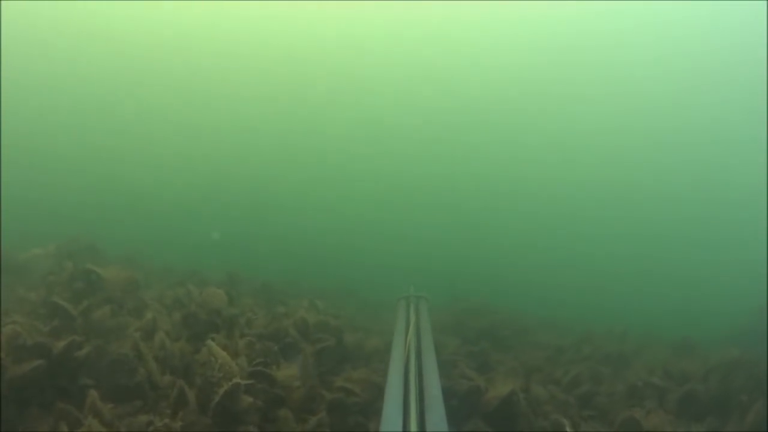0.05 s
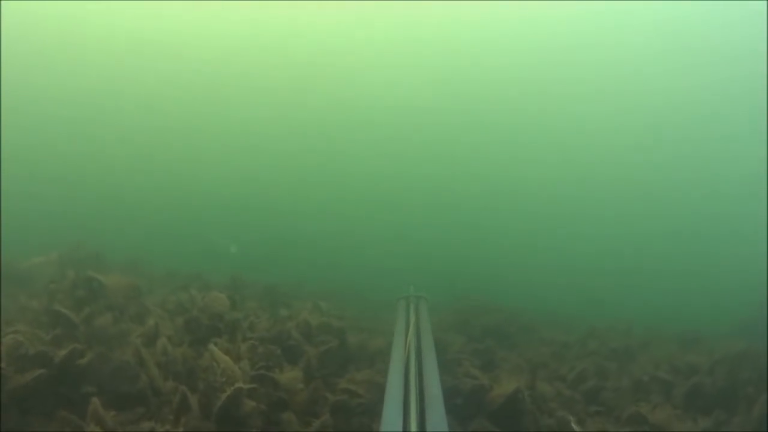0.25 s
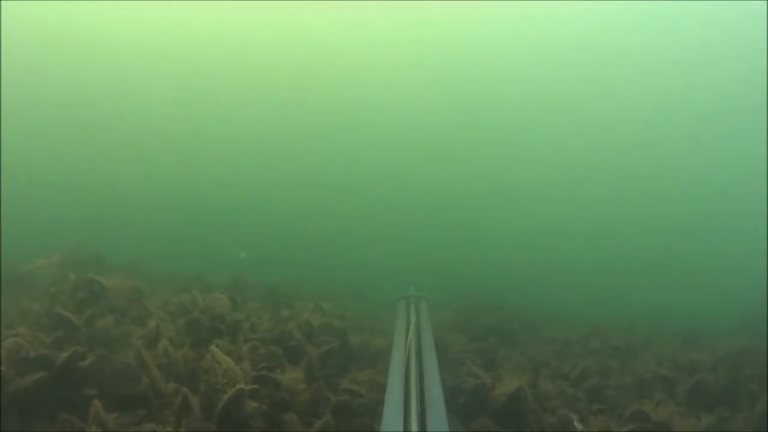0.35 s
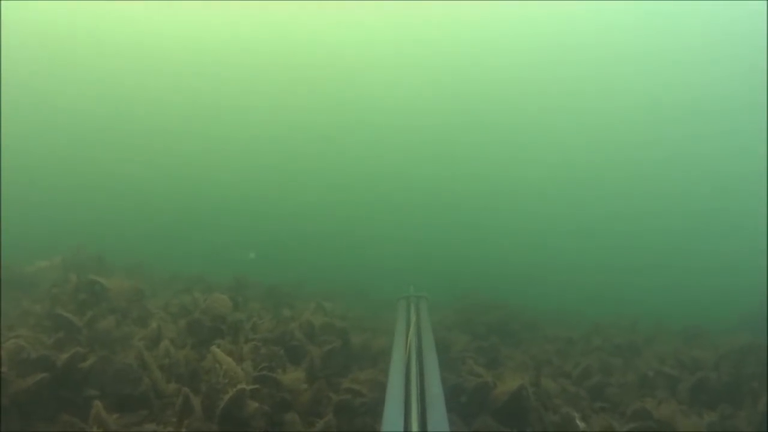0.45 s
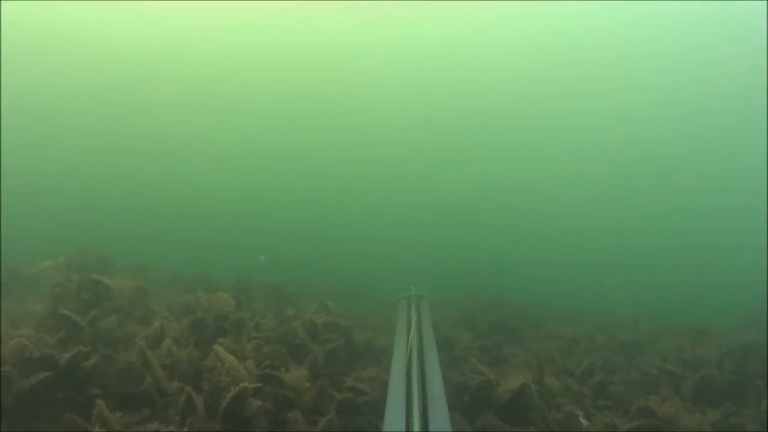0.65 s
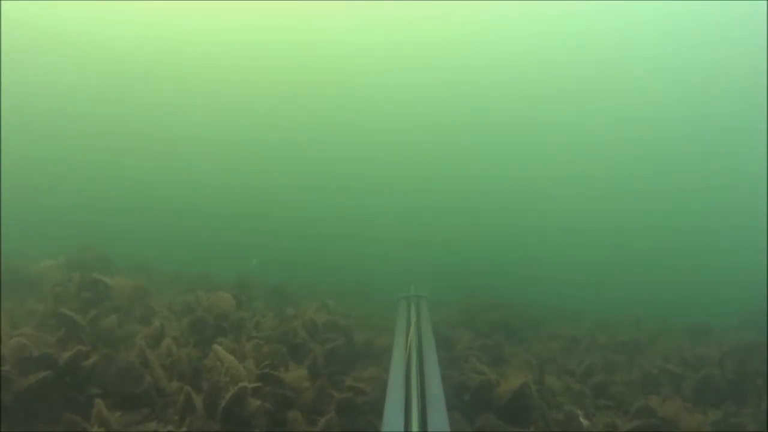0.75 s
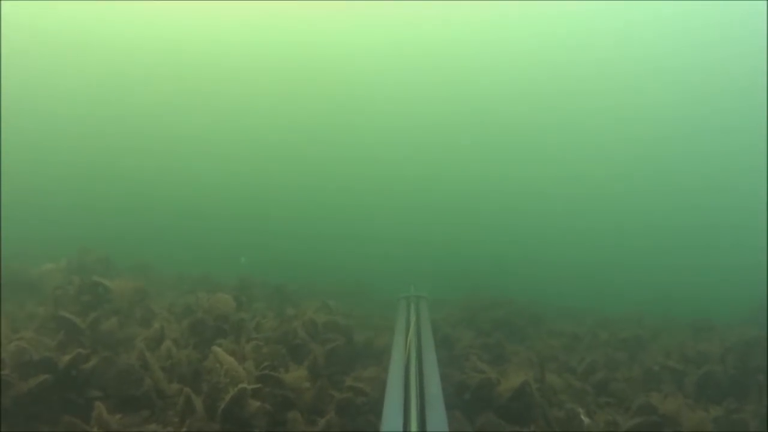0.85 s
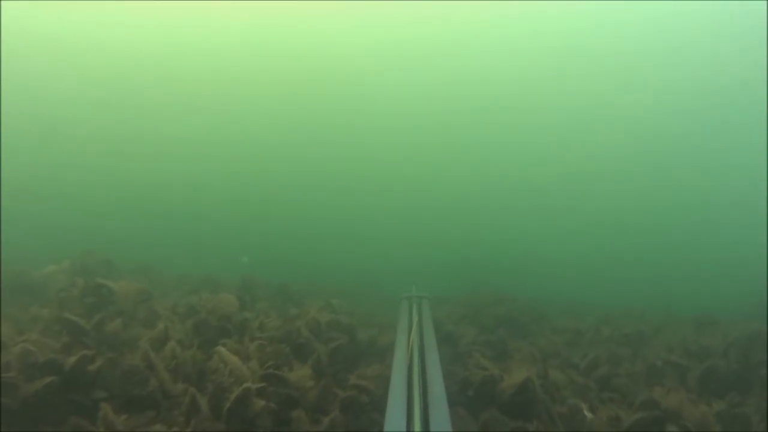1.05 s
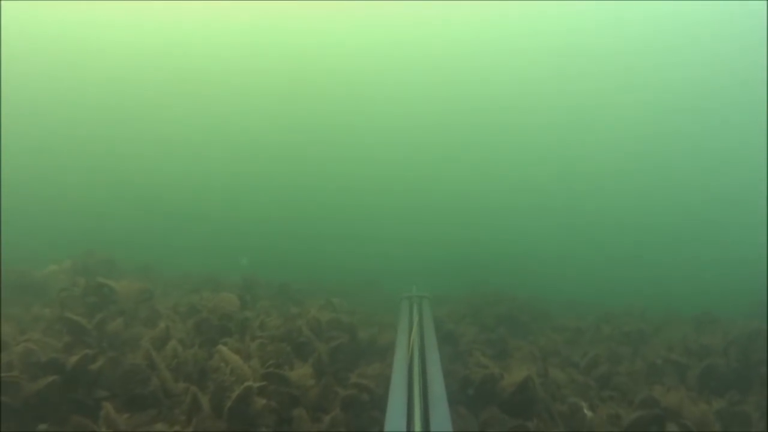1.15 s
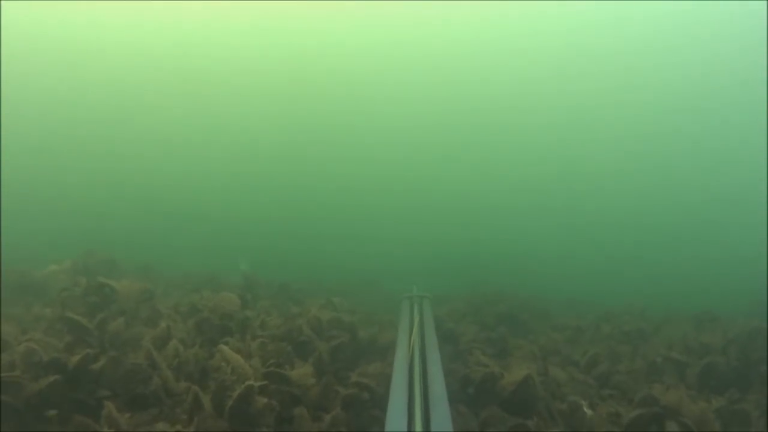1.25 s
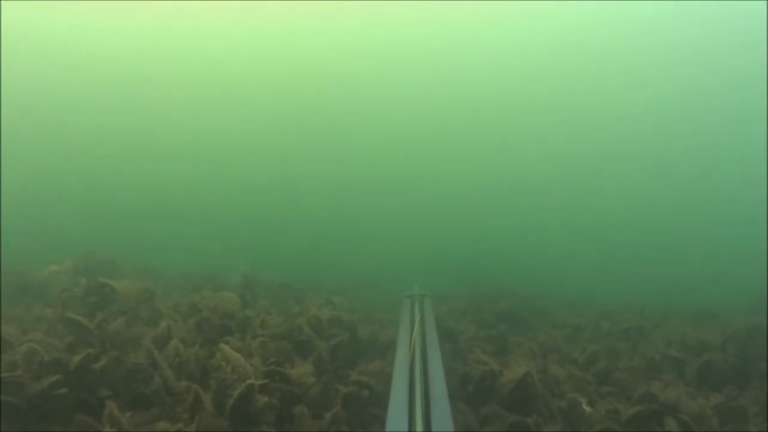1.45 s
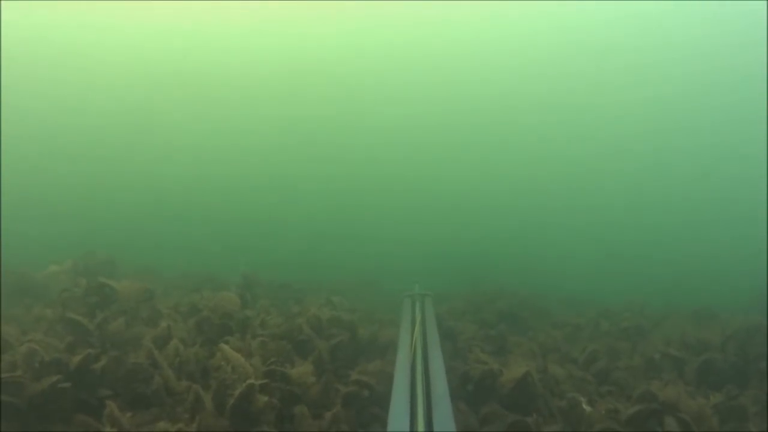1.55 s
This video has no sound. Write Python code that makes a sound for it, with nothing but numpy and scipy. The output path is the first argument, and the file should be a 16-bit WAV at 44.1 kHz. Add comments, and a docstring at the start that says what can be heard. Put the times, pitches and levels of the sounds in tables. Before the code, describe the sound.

A fish probably drums underwater: two low thumps falling in pitch, with faint ticks around.

```python
"""Underwater, over a shell bed, heard from a camera in its housing: two short booming thumps, probably
a fish drumming on its swim bladder, after the tail of an earlier one. Each is a nearly pure tone that
swells while its pitch falls by more than an octave, then stops and leaves a faint low ring.
Tiny snaps near and far, soft knocks close by and one dull crack dot a quiet wash and rumble.
The housing colours the fish, the knocks and the crack differently in the two channels."""
import sys
import numpy as np
from scipy.fft import rfft, irfft, next_fast_len
from scipy.io import wavfile
from scipy.ndimage import map_coordinates

SR = 44100
rng = np.random.default_rng(int(sys.argv[2]) if len(sys.argv) > 2 else 0)


def wrap_up_sound(samples):
    """Save the sound to the file named by the first command line argument, as 16-bit audio."""
    columns = np.atleast_2d(samples).T
    # keep every value between -1 and 1, then stretch to whole-number steps
    tamed = np.clip(columns, -1, 1)
    steps = np.round(tamed * 32767).astype(np.int16)
    wavfile.write(sys.argv[1], SR, steps)


N = 70560
T = np.arange(N) / SR

# wash common to both channels (frequency [Hz], relative density [dB])
WASH_MID_SPECTRUM = [(15, -36.5), (25, -6.5), (118, -3.5), (241, -14.5), (362, -13), (401, -20), (433, -14),
                     (862, -13.5), (1110, -21), (1330, -19.5), (4870, -27.5), (6120, -27), (11000, -30.5),
                     (14300, -62), (22000, -120)]
# wash opposed in the two channels (frequency [Hz], relative density [dB])
WASH_SIDE_SPECTRUM = [(15, -51), (25, -18.5), (69, -6), (156, -2.5), (192, -5), (218, -3), (336, -7.5),
                      (362, -0.5), (391, -4.5), (840, -6), (954, -6.5), (1510, -12.5), (3240, -22),
                      (5390, -27), (11000, -35.5), (14300, -65.5), (22000, -120)]
# low rumble of the water (frequency [Hz], relative density [dB])
RUMBLE_SPECTRUM = [(25, -12), (60, -6), (110, -0.5), (175, -4), (240, -8), (500, -15.5), (1200, -46)]
# trend of the rumble as it settles (time [s], level [dB])
RUMBLE_TREND = [(0, -59), (.45, -66), (1, -69), (1.4, -83.5)]
# end of an earlier thump (time [s], pitch [Hz], level [dB], t60 [s])
EARLIER_TAIL = (0, 134, -15, 0.0775)
# low ring after each thump (time [s], pitch [Hz], level [dB], t60 [s])
AFTER_RINGS = [(0, 169.4, -44, 0.41), (.33, 160.7, -39.5, 0.23), (0.825, 156.8, -40.5, .22)]
# soft knocks close by (time [s], pitch [Hz], level [dB], t60 [s])
SOFT_KNOCKS = [(0.109, 105, -48, .09), (.125, 240, -54.5, .06), (0.511, 110, -52.5, .07),
               (0.584, 185, -58.5, .1), (.982, 186.4, -50, 0.146), (1.075, 80.4, -54.5, .09),
               (1.096, 730, -59, 0.049), (1.256, 166.5, -53.5, 0.066), (1.263, 700, -52.5, 0.068),
               (1.337, 834, -52, 0.063), (1.372, 869, -55.5, 0.074)]
# grit in a knock (frequency [Hz], relative density [dB])
GRIT_SPECTRUM = [(60, -7), (200, -1), (350, -2.5), (800, -5.5), (1200, -22), (3000, -36.5)]
# near snaps (time [s], unused peak [dB], middle before boost [dB], treble before boost [dB])
NEAR_SNAPS = [(0.1091, -55, -63.5, -75.5), (0.1835, -47, -62.5, -59.5), (0.4219, -47.5, -74, -69),
              (0.5366, -59, -80, -69), (0.615, -46.5, -63.5, -63), (0.7257, -55, -65, -68.5),
              (0.751, -46.5, -59.5, -68.5), (1.076, -51.5, -61.5, -64), (1.1221, -48, -60, -56.5),
              (1.206, -51.5, -57.5, -65), (1.3109, -53, -81, -65.5), (1.3283, -59.5, -65, -69),
              (1.3641, -45.5, -53, -63.5)]
# middle band of a snap (frequency [Hz], relative density [dB])
MIDDLE_SPECTRUM = [(500, -17), (1200, -6.5), (2000, 0.5), (3000, -5.5), (4500, -14), (9000, -29)]
# treble band of a snap (frequency [Hz], relative density [dB])
TREBLE_SPECTRUM = [(2000, -18), (4000, -5.5), (5200, 0), (6400, 4), (7500, -8), (11000, -10.5)]
# likeness of the snaps in left and right (frequency [Hz], correlation [-1 to 1])
SNAP_LIKENESS = [(1500, 0.9), (6000, .5)]
# course of the tone, one table per thump (time [s], pitch [Hz], level [dB], octave level [dB])
THUMP_COURSES = [
    [(0.206, 259.7, -24.5, -37), (0.217, 245.1, -15, -24), (0.236, 208, -8.5, -23.5),
     (0.25, 189.6, -6, -41.5), (0.259, 143.8, -5, -32), (0.275, 119.4, -5.5, -32),
     (0.291, 108.5, -6.5, -30.5), (0.299, 112.6, -11.5, -27.5), (0.306, 52.13, -31, -30),
     (0.314, 69.43, -33, -42), (0.326, 140.8, -28.5, -51), (0.338, 115.2, -53.5, -67.5)],
    [(0.692, 288.7, -27, -40.5), (0.704, 283.2, -15.5, -25), (0.716, 249.8, -12.5, -29.5),
     (0.73, 195.6, -6, -17.5), (0.74, 186.3, -4, -34.5), (0.751, 133.4, -6.5, -31), (0.776, 116, -4.5, -33),
     (0.788, 104.7, -8, -29.5), (0.797, 97.2, -14, -31), (0.804, 58.2, -25, -44), (0.816, 107, -25, -56),
     (0.83, 96.26, -46, -54.5)],
]
# higher overtones before the housing colours them (multiple of the pitch, level re the tone [dB])
THUMP_OVERTONES = [(3, -22.5), (4, -37), (5, -33), (6, -42), (7, -38)]
# housing colour on those overtones (frequency [Hz], gain [dB])
HOUSING_COLOUR = [(310, -7.5), (370, 0), (440, -1), (520, -10.5), (620, -9), (720, -23.5), (950, -20.5),
                  (1500, -30)]
# rasp in a thump (frequency [Hz], relative density [dB])
RASP_SPECTRUM = [(30, 2), (80, 5), (300, -10), (600, -14.5), (900, -18), (1500, -28.5), (2500, -33.5),
                 (4500, -49.5)]
# dull crack (frequency [Hz], relative density [dB])
CRACK_SPECTRUM = [(350, -12.5), (700, 3.5), (1400, -1.5), (2500, -15), (5000, -28)]
# level of the right channel against the left (frequency [Hz], gain [dB])
RIGHT_GAIN = [(70, 9), (105, -2.5), (135, -3.5), (170, -8), (200, -9.5), (238, -12), (280, -11),
              (420, -3.5), (580, 0.5)]
# phase of the right channel against the left (frequency [Hz], lead [rad])
RIGHT_PHASE = [(70, .2), (120, 1.2), (175, .12), (205, .33), (240, 1.1), (300, 2.4), (420, 2.24),
               (580, 2.84), (850, 1.56), (1300, .7)]


def amp(db):
    """Decibels to gain."""
    return 10 ** (np.asarray(db) / 20)


def along(points, hz):
    """A table's value at hz, interpolated on a log frequency axis."""
    frequencies, values = np.transpose(points)
    return np.interp(np.log(hz + 1), np.log(frequencies + 1), values)


def curves(rows):
    """One value per sample for each column after the time."""
    times, *columns = np.transpose(rows)
    return [np.interp(T, times, column) for column in columns]


def wobble(knots_per_s):
    """A smooth random curve."""
    return map_coordinates(rng.standard_normal(int(N * knots_per_s / SR) + 4), [T * knots_per_s])


def filtered(x, response):
    """x through a complex frequency response."""
    size = next_fast_len(N + SR // 2)
    return irfft(rfft(x, size) * response(np.fft.rfftfreq(size, 1 / SR)), size)[..., :N]


def noise(spectrum):
    """Coloured noise of rms 1."""
    x = filtered(rng.standard_normal(N), lambda hz: amp(along(spectrum, hz)))
    return x / np.sqrt(np.mean(x ** 2) + 1e-20)


def noise_pair(spectrum, likeness):
    """Stereo coloured noise with a given correlation between the channels."""
    angle = lambda hz: np.arccos(np.clip(along(likeness, hz), -1, 1)) / 2
    mid = filtered(noise(spectrum), lambda hz: np.cos(angle(hz)))
    side = filtered(noise(spectrum), lambda hz: np.sin(angle(hz)))
    return np.array([mid + side, mid - side])


def burst(start, rise_s, t60_s):
    """An envelope that rises at start and dies away."""
    age = np.maximum(T - start, 0)
    return (1 - np.exp(-age / rise_s)) * np.exp(-np.log(1000) * age / t60_s)


def ping(start, hz, db, t60_s, rise_s):
    """One damped vibration."""
    return amp(db) * burst(start, rise_s, t60_s) * np.sin(2 * np.pi * hz * (T - start))


def water(mid_db=-65.5, side_db=-61, flutter_db=1.5):
    """All around the microphone: a steady quiet wash and a low rumble that settles unevenly."""
    mid = amp(mid_db) * noise(WASH_MID_SPECTRUM)
    side = amp(side_db) * noise(WASH_SIDE_SPECTRUM)
    rumble_db = curves(RUMBLE_TREND)[0] + flutter_db * wobble(knots_per_s=42)
    rumble = amp(rumble_db) * noise_pair(RUMBLE_SPECTRUM, likeness=[(100, .4)])
    return np.array([mid + side, mid - side]) + rumble


def fish():
    """Probably a swim bladder being drummed: an earlier tail, two thumps and the faint ring of each."""
    tail = ping(*EARLIER_TAIL, rise_s=.0006)
    rings = sum(ping(*row, rise_s=.023) for row in AFTER_RINGS)
    return tail + rings + sum(thump(course) for course in THUMP_COURSES)


def knocks(rise_s=.003, grit_gain_db=-4.5):
    """Faint dull bumps near the camera, each a short ring with some grit."""
    rings = sum(ping(*row, rise_s) for row in SOFT_KNOCKS)
    envelope = sum(amp(db) * burst(start, rise_s, t60_s) for start, _, db, t60_s in SOFT_KNOCKS)
    return rings + amp(grit_gain_db) * envelope * noise(GRIT_SPECTRUM)


def snaps(middle_boost_db=5, treble_boost_db=7.5, far_per_s=31, far_floor_db=-76.5, far_spread_db=3):
    """Tiny cracks from the sea bed, perhaps shrimp: a few near ones and a scatter of far ones."""
    near = [(start, middle_db + middle_boost_db, treble_db + treble_boost_db)
            for start, _, middle_db, treble_db in NEAR_SNAPS]
    far = [(when * N / SR, *(far_floor_db - far_spread_db * np.log(band_draws)))
           for when, *band_draws in rng.random((int(far_per_s * N / SR), 3))]
    middle_envelope, treble_envelope = sum(
        amp([[middle_db], [treble_db]]) * burst(start, rise_s=.00077, t60_s=.026)
        for start, middle_db, treble_db in near + far)
    middle = middle_envelope * noise_pair(MIDDLE_SPECTRUM, SNAP_LIKENESS)
    treble = treble_envelope * noise_pair(TREBLE_SPECTRUM, SNAP_LIKENESS)
    return middle + treble


def thump(course, attack_s=.0015, release_s=.003, shimmer_db=1.05, rasp_db=-46, rasp_db_per_db=.68):
    """One boom: a falling tone with its octave, weak flickering overtones and a faint rasp."""
    hz, db, octave_db = curves(course)
    start, end = course[0][0], course[-1][0]
    phase = 2 * np.pi * np.cumsum(hz * (T >= start)) / SR
    gate = np.clip((T - start) / attack_s, 0, 1) * np.clip((end - T) / release_s, 0, 1)
    tone = np.sin(phase)
    for multiple, overtone_db in THUMP_OVERTONES:
        colour_db = along(HOUSING_COLOUR, multiple * hz)
        flicker_db = shimmer_db * wobble(knots_per_s=100)
        tone -= amp(overtone_db + colour_db + flicker_db) * np.sin(multiple * phase)
    octave = amp(octave_db) * np.cos(2 * phase)
    # the rasp grows with the tone and pulses once a cycle
    rasp = amp(rasp_db + rasp_db_per_db * db) * (1 + np.sin(phase)) * noise(RASP_SPECTRUM)
    return gate * (amp(db) * tone - octave + rasp)


def crack():
    """One dull burst of noise at the height of the second thump."""
    return amp(db=-46) * burst(start=.7562, rise_s=.00077, t60_s=.04) * noise(CRACK_SPECTRUM)


def housing(left):
    """The housing puts the right channel out of step, stronger in the deep bass and weaker above it."""
    right = filtered(left, lambda hz: amp(along(RIGHT_GAIN, hz)) * np.exp(1j * along(RIGHT_PHASE, hz)))
    return np.array([left, right])


def scene():
    """All sources at the camera's microphone, in stereo."""
    return water() + housing(fish() + knocks() + crack()) + snaps()


def record(dry, top_hz=11150):
    """The camera keeps nothing above its band limit."""
    return filtered(dry, lambda hz: hz < top_hz)


dry = scene()
out = record(dry)
wrap_up_sound(out)
```